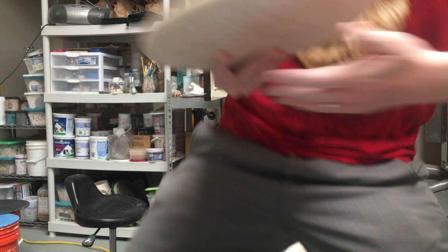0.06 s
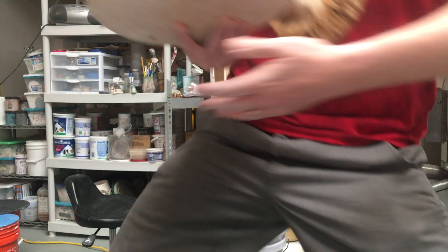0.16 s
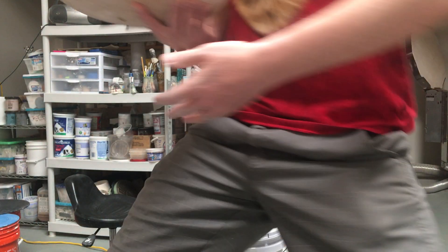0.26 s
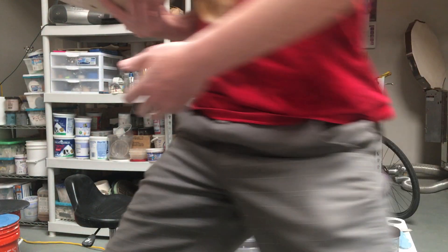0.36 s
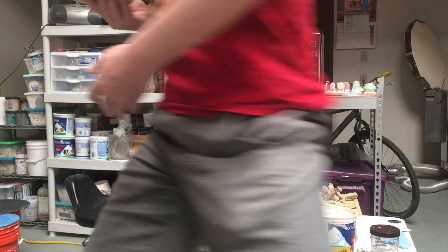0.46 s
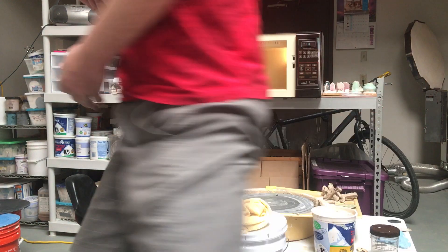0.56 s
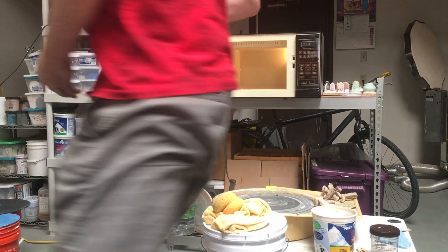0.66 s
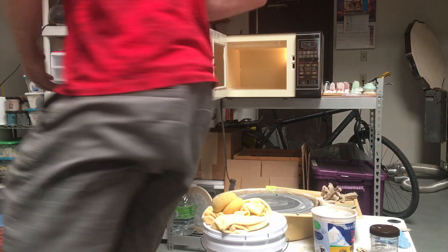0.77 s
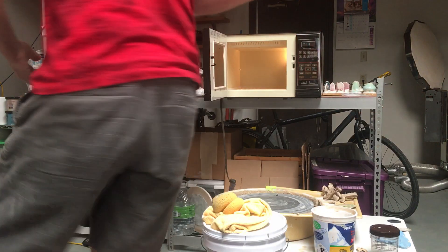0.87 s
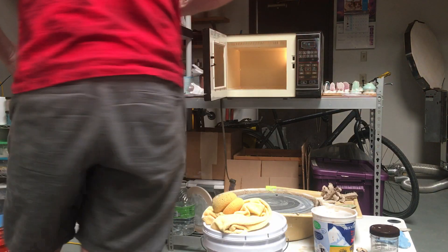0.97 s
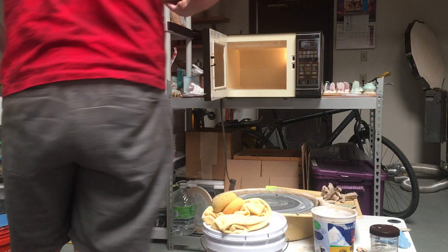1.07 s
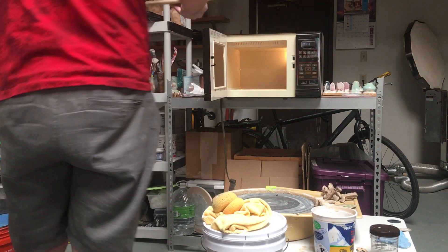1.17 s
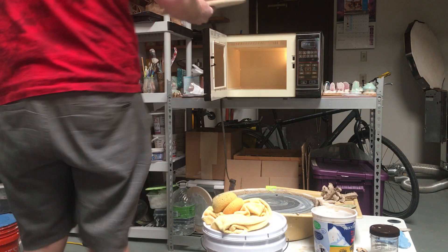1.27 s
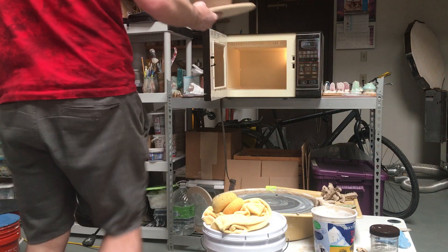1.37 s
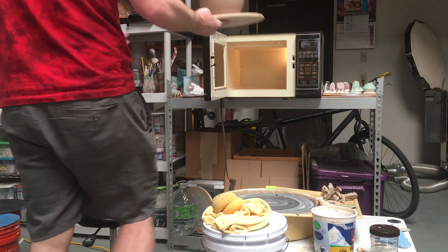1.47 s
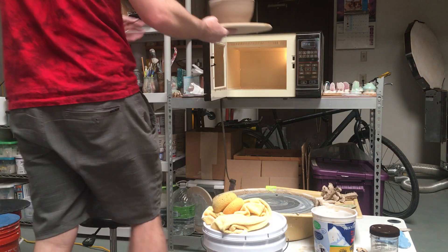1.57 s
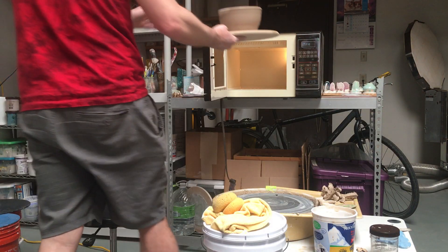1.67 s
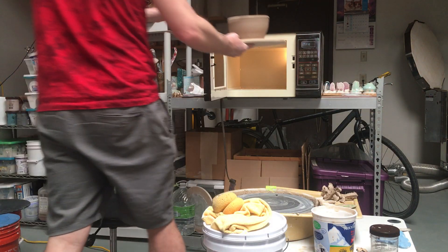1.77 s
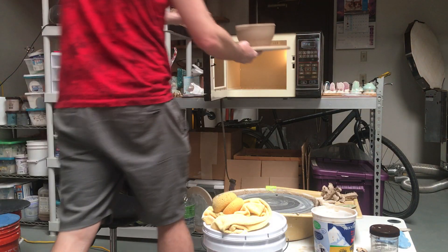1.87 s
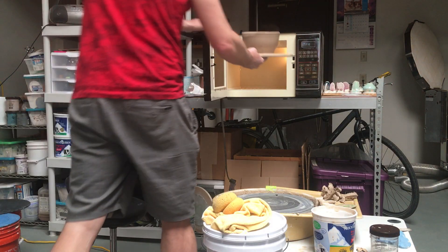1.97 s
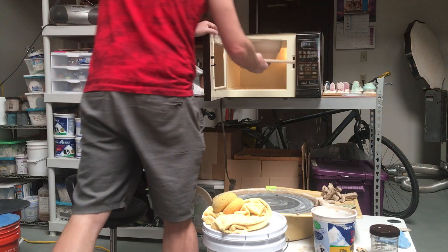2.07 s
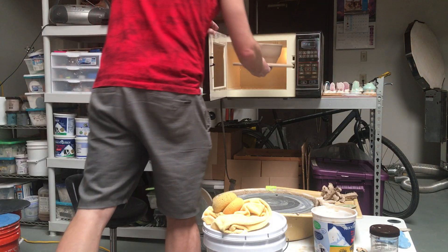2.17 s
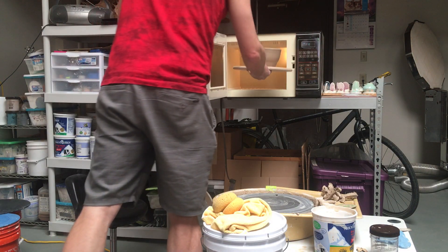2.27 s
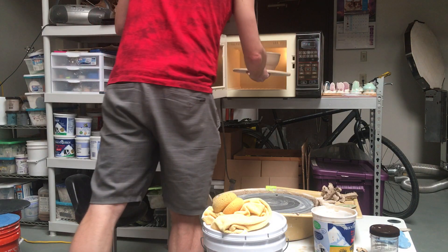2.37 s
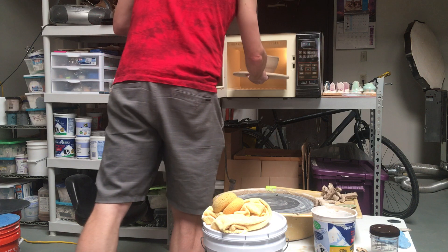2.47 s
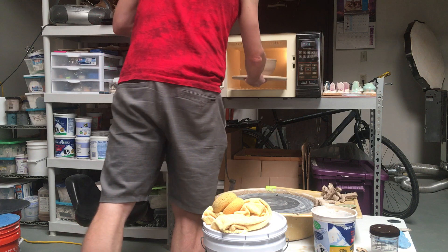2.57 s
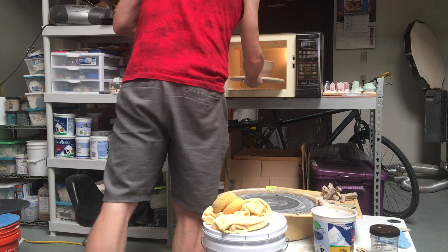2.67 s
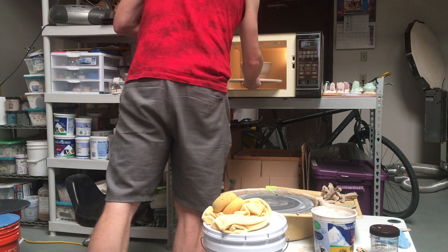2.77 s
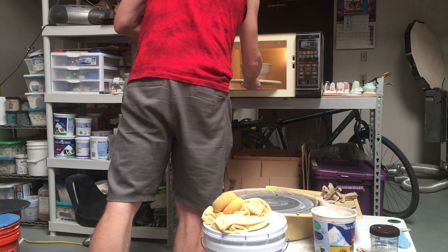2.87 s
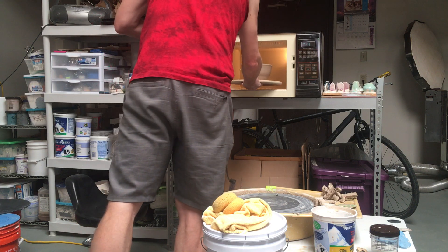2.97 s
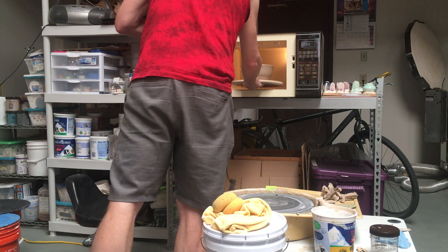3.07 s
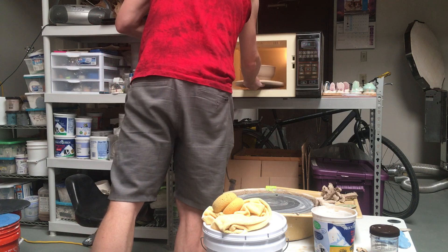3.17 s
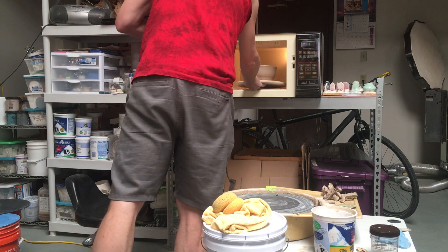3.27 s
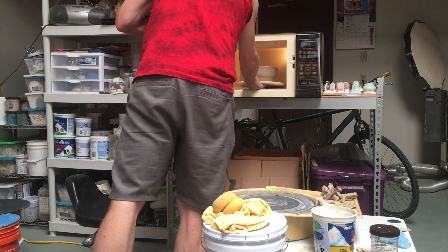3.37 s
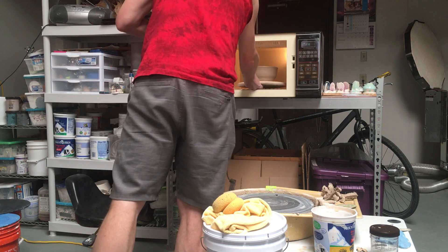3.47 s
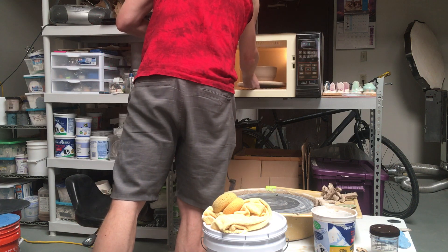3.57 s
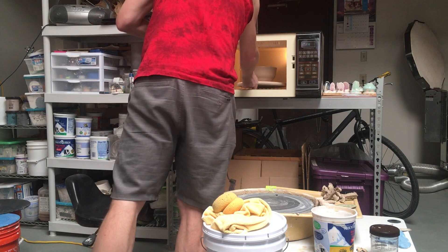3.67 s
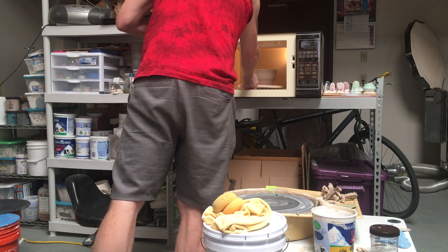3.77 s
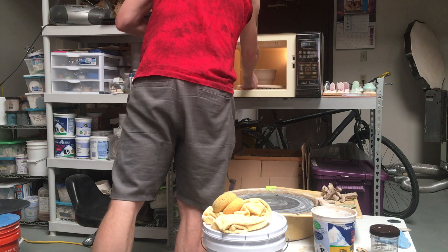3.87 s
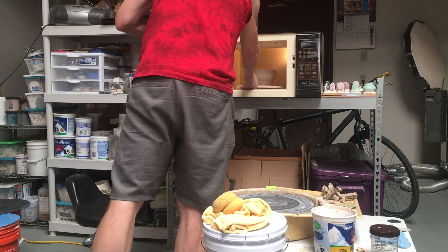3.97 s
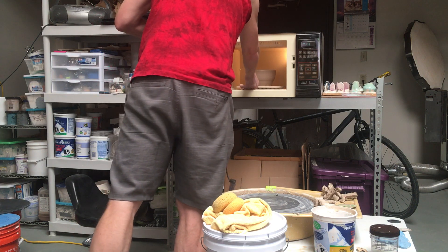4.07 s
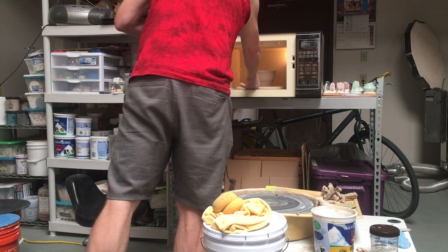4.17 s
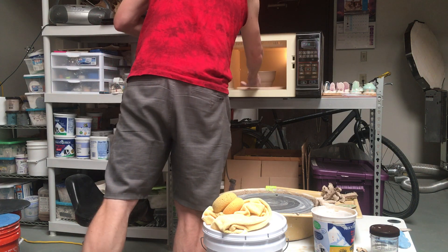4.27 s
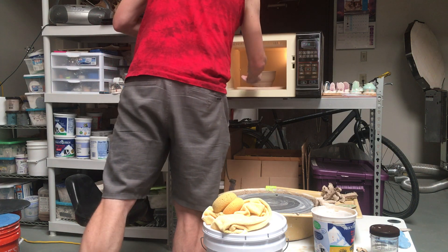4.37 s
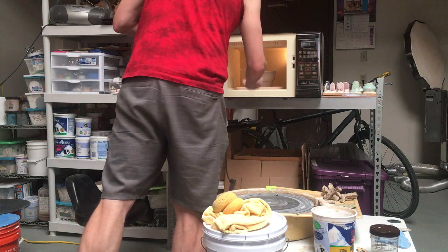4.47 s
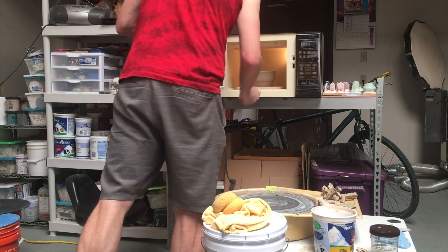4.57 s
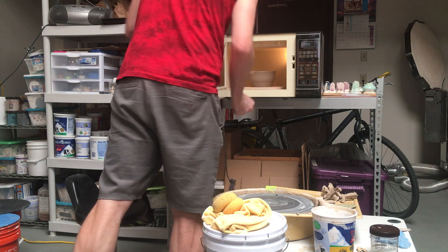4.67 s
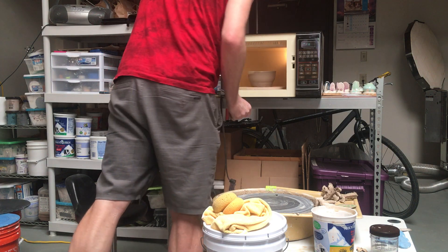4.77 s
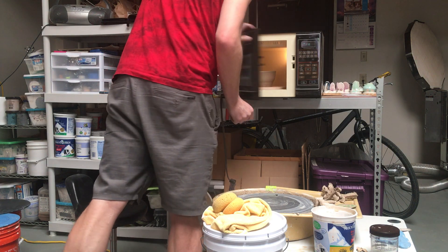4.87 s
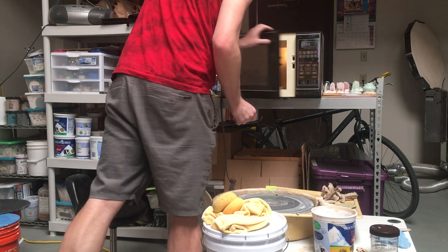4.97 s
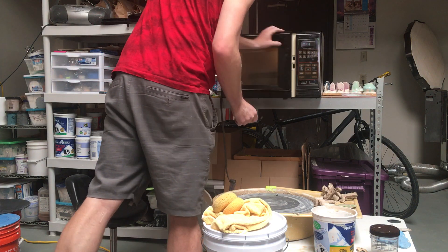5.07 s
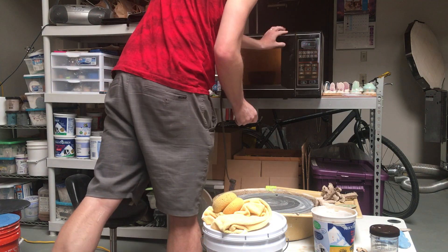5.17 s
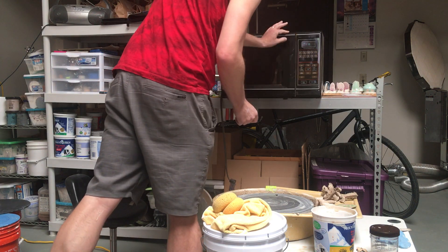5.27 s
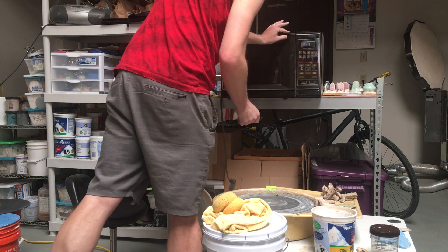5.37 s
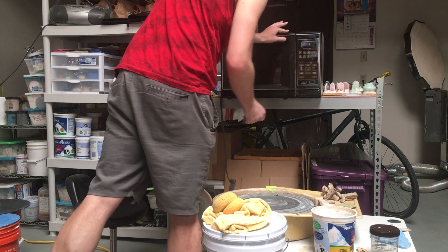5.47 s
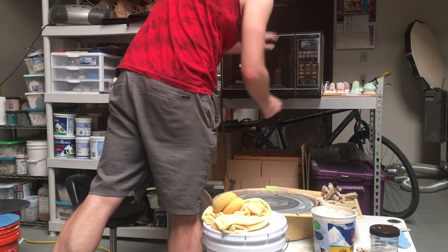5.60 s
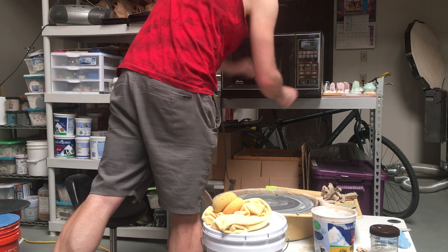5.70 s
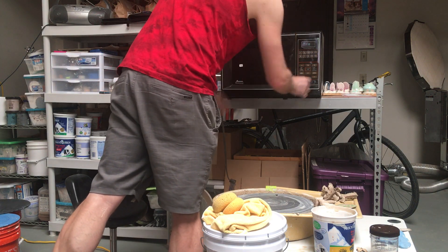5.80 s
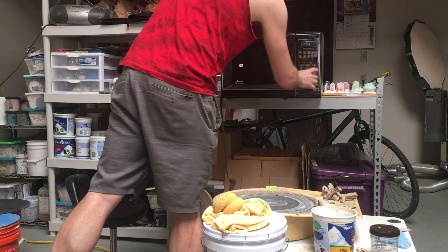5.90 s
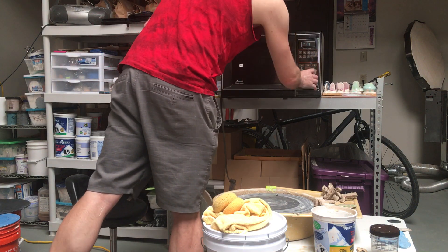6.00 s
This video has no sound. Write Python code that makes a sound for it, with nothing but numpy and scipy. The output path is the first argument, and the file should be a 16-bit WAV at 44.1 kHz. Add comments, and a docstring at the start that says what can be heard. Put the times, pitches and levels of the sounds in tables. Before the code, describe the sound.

Low machine drone, gritty shuffling and small taps, clay bumped and slid inside a microwave oven, then a loud latch clatter with a thump and swelling hum.

```python
"""Clay bowl into the microwave oven

Someone carries a clay bowl on a plate across a garage workshop: filtered noise and ringing specks make
the scuffs, damped resonances the ticks and bumps. The plate knocks on the oven floor and the door latches
and slams: clicks strike clattering noise and ringing modes. The hinge squeaks as noise through resonances.
Steady sines drone over coloured noise throughout, and a lower hum swells once the door is shut."""
import sys
import numpy as np
from scipy import signal
from scipy.fft import rfft, irfft, next_fast_len
from scipy.io import wavfile

SR = 44100
rng = np.random.default_rng(int(sys.argv[2]) if len(sys.argv) > 2 else 0)


def store_pcm(level_fs):
    """Save levels as 16-bit WAV."""
    pcm = np.round(np.clip(level_fs, -1, 1) * 32767).astype(np.int16)
    wavfile.write(sys.argv[1], SR, np.atleast_2d(pcm).T)


N = 266364
T = np.arange(N) / SR  # time in s


def from_db(db):
    """Decibels to amplitude gain."""
    return 10 ** (np.asarray(db) / 20)


def rms_one(x):
    """Scale to unit rms."""
    return x / np.sqrt(np.mean(x ** 2) + 1e-20)


def at_hz(points, hz):
    """Read a (f/Hz, value) table on a log-frequency axis."""
    table_hz, values = np.transpose(points)
    return np.interp(np.log(hz), np.log(table_hz), values)


def low_pass(x, hz):
    """Second-order roll-off of the treble."""
    return signal.sosfilt(signal.butter(2, hz, fs=SR, output="sos"), x + 1e-18)


def clicks(rows):
    """One impulse for each row of (t/s, level/dB)."""
    out = np.zeros(N)
    for s, db in rows:
        out[round(s * SR)] += from_db(db)
    return out


def envelope(start, attack, hold, release_db_per_s):
    """Rise evenly to 1, hold, then die away at a steady rate in dB."""
    age = T - start
    rise = np.clip(age / max(attack, 1 / SR), 0, 1)
    return rise * from_db(-release_db_per_s * np.maximum(age - attack - hold, 0))


def ring(x, hz, t60):
    """A damped resonance: a unit click starts a decaying sine of height 1."""
    radius = from_db(-60 / (t60 * SR))
    angle = 2 * np.pi * hz / SR
    feedback = [1, -2 * radius * np.cos(angle), radius * radius]
    return signal.lfilter([0, np.sin(angle)], feedback, x + 1e-18)


def noise(colour):
    """Steady noise of the given spectrum, rms 1."""
    size = next_fast_len(N)
    hz = np.maximum(np.fft.rfftfreq(size, 1 / SR), 1)
    spectrum = rfft(rng.standard_normal(size)) * from_db(at_hz(colour, hz))
    return rms_one(irfft(spectrum, size)[:N])


def clatter(colour, body_t60, room_db):
    """Response to one blow: short-lived body noise, then the room dying band by band; energy 1."""
    # room decay: f/Hz, t60/s
    room_t60 = [(100, 0.96), (500, 0.62), (1500, 0.52), (3500, 0.54), (6000, 0.43), (10000, 0.27),
                (15000, 0.18)]
    t = T[:SR * 2 // 3]
    edges = np.geomspace(45, 17000, 21)
    white = rng.standard_normal((2, len(t)))
    body = from_db(-60 * t / body_t60)
    out = 0
    for k, (low, high) in enumerate(zip(edges, edges[1:])):
        hz = np.sqrt(low * high)
        room = from_db(room_db - 60 * t / at_hz(room_t60, hz))
        band = signal.butter(2, [low, high], "band", fs=SR, output="sos")
        # neighbouring bands take turns with two independent noises
        burst = signal.sosfilt(band, white[k % 2] * (body + room))
        out = out + from_db(at_hz(colour, hz)) * burst
    return out / np.sqrt(np.sum(out ** 2))


def through(x, response):
    """Pass a signal through an impulse response."""
    return signal.oaconvolve(x, response)[:N]


def struck_modes(modes, blows, spread_db):
    """Every blow wakes each damped mode with a random strength and sign of its own."""
    blows = np.array(blows)
    draws = rng.standard_normal((len(blows), 2, len(modes)))
    weights = np.sign(draws[:, 0]) * from_db(spread_db * draws[:, 1])
    return sum(from_db(db) * ring(w @ blows, hz, t60) for w, (hz, db, t60) in zip(weights.T, modes))


def plate(clatter_db=2, modes_db=-1, boom_hz=170):
    """Clay meets the oven floor; a softer touch is duller, and the cavity booms beneath it."""
    # plate on the oven floor: t/s, level/dB, contact softness as cut-off f/Hz, relative boom level/dB
    contacts = [(3.2177, -10, 1640, 4), (3.365, -33.5, 3030, -10), (3.468, -31.5, 3000, 18),
                (4.2646, -3, 4640, -9.5), (4.277, -8.5, 3160, -10), (4.291, -13.5, 2200, -6)]
    # spectrum of the knocks: f/Hz, level/dB
    knock_colour = [(60, 7.5), (130, 8.5), (300, 4.5), (520, -1.5), (800, -1), (1200, -4), (2300, -3.5),
                    (3300, -9.5), (5000, -15), (8000, -12.5), (15000, -17)]
    # plate and oven cavity resonances: f/Hz, relative level/dB, t60/s
    oven_modes = [(190.1, -31.5, 0.44), (255.8, -36.5, 0.24), (363, -56, 0.38), (459, -44, 0.54),
                  (606, -48, 0.44), (746, -43, 0.38), (890, -46, 0.34), (1027, -47, 0.54),
                  (1316, -39, 0.24), (1762, -33, 0.086), (1856, -44, 0.15), (2036, -38.5, 0.18),
                  (2300, -32, 0.061), (2770, -65, 0.43)]
    blows = []
    for s, db, soft_hz, boom_db in contacts:
        blow = clicks([(s, db)])
        boom = from_db(boom_db) * low_pass(blow, boom_hz)
        blows.append(low_pass(blow, soft_hz) + boom)
    knocks = sum(through(blow, clatter(knock_colour, body_t60=0.072, room_db=-5.5)) for blow in blows)
    ringing = struck_modes(oven_modes, blows, spread_db=2.5)
    return from_db(modes_db) * ringing + from_db(clatter_db) * knocks


def door(clatter_db=-1, panel_db=-4):
    """The latch clacks in quick steps, each striking its own clatter and mix of panel modes."""
    # hooks ride over the catch, the door lands and rattles: t/s, relative level/dB
    hits = [(5.2502, -9), (5.262, -6.5), (5.2693, -4.5), (5.28, -14.5), (5.2919, -1.5), (5.296, 0),
            (5.301, -3.5), (5.322, -13.5)]
    # spectrum of the clack: f/Hz, level/dB
    door_colour = [(60, -13), (170, 10.5), (300, 4), (520, -5.5), (1000, 2.5), (1500, 1.5), (2200, 3),
                   (3200, 0.5), (4900, -7.5), (6500, -3), (10000, -9), (15000, -9)]
    # latch and door panel resonances: f/Hz, relative level/dB, t60/s
    door_modes = [(890, -35.5, 0.1), (1074, -57, 1), (1166, -37, 0.23), (2070, -35, 0.13),
                  (2307, -38.5, 0.25), (2724, -39.5, 0.29), (2955, -44, 0.24), (3260, -44, 0.26),
                  (3340, -52, 0.45), (4050, -45, 0.23), (6500, -54, 0.2)]
    blows = [clicks([hit]) for hit in hits]
    clack = sum(through(blow, clatter(door_colour, body_t60=0.049, room_db=-7.5)) for blow in blows)
    panel = struck_modes(door_modes, blows, spread_db=2)
    return from_db(clatter_db) * clack + from_db(panel_db) * panel


def thump(push_hz=240):
    """The door's weight rocks the cabinet on its shelf: softened pushes ring low modes."""
    # pushes of the door's weight: t/s, relative level/dB
    pushes = [(5.268, -2.5), (5.299, 0.5), (5.358, -6)]
    # cabinet and shelf resonances: f/Hz, relative level/dB, t60/s
    thump_modes = [(59.3, -29, 0.64), (76.6, -48, .4), (92.8, -34, 0.83), (103.9, -22.5, 0.31),
                   (172.7, -31.5, 0.35), (290, -36, 0.17)]
    push = low_pass(clicks(pushes), push_hz)
    return sum(from_db(db) * ring(push, hz, t60) for hz, db, t60 in thump_modes)


def hinge():
    """Faint rasping squeaks: fine slips in a few broad resonances, each catch dying away."""
    # the hinge catches as the door swings: t/s, level/dB, pitch as a ratio
    squeaks = [(5.129, -62, 1.044), (5.181, -68.5, 0.92)]
    # hinge resonances before the pitch ratio: f/Hz, relative level/dB, t60/s
    hinge_modes = [(1440, 1, 0.013), (2300, 2.5, .005), (5730, 5, 0.0034), (8500, 8.5, 0.0013)]
    slips = rng.standard_normal(N)
    out = 0
    for s, db, ratio in squeaks:
        squeak = sum(from_db(mode_db) * ring(slips, ratio * hz, t60) for hz, mode_db, t60 in hinge_modes)
        swing = envelope(s, attack=0.0035, hold=0.01, release_db_per_s=150)
        out = out + from_db(db) * swing * rms_one(squeak)
    return out


def ticks(cycles=5.8, grit_t60=0.023, grit_db=-14, room_db=-8):
    """Small sharp contacts: a few cycles of one damped resonance with a gritty crack, then the room."""
    # ticks and taps of hands, plate, shoes and latch: t/s, level/dB, pitch f/Hz, relative crack level/dB
    taps = [(.042, -40, 3130, -9), (.329, -35.5, 3430, -8.5), (.359, -40, 3300, -4),
            (0.3782, -19.5, 3250, -2.5), (0.3793, -33, 1920, -24), (.604, -40.5, 610, -20),
            (.909, -41, 1480, -2.5), (.966, -42.5, 590, 0.5), (.982, -38.5, 780, -13),
            (1.233, -35.5, 640, 2.5), (1.258, -31, 2300, -1), (1.292, -31, 2640, -12),
            (1.348, -39, 1060, 2), (1.379, -37, 576, 1.5), (1.879, -36.5, 400, -2),
            (3.219, -50.5, 5050, 9.5), (3.299, -47.5, 7040, 1), (4.569, -47, 640, -18),
            (5.2973, -15, 3020, -0.5)]
    # spectrum of the room's answer: f/Hz, level/dB
    room_colour = [(100, 0), (15000, -4)]
    out = np.zeros(N)
    t = T[:SR // 8]
    touch = (t == 0) * 1.0
    for s, db, hz, crack_db in taps:
        grain = from_db(grit_db - 60 * t / grit_t60) * rng.standard_normal(len(t))
        band = signal.butter(2, [hz / 2, min(12 * hz, 11000)], "band", fs=SR, output="sos")
        crack = signal.sosfilt(band, touch + 2 * grain)
        tick = ring(touch, hz, cycles / hz) + from_db(crack_db) * crack
        at = round(s * SR)
        out[at:at + len(t)] += from_db(db) * tick
    room = through(out, clatter(room_colour, body_t60=0.12, room_db=-8.5))
    return out + from_db(room_db) * room


def friction_levels():
    """Strength of rasp and hiss: brief rubs share one shape, scuff and slide follow their effort."""
    # brief rubs of soles, cloth and plate: t/s, attack/s, hold/s, relative rasp level/dB, hiss level/dB
    rubs = [(0.89, 0.1, 0.071, -58, -64.5), (1.238, 0.014, .11, -56.5, -64.5),
            (1.788, 0.0037, 0.0084, -73.5, -61), (2.582, 0.0057, 0.024, -67, -63.5),
            (4.202, 0.08, .005, -58.5, -62.5), (4.62, .45, .04, -86, -71.5)]
    # long scuff during the turn toward the oven: t/s, relative rasp level/dB, hiss level/dB
    scuff = [(0.39, -62, -55), (0.428, -54.5, -49.5), (0.492, -56.5, -56), (0.592, -66.5, -57.5),
             (0.598, -68, -61), (0.64, -70, -67)]
    # the plate slides into the oven: t/s, relative rasp level/dB, hiss level/dB
    slide = [(3.365, -68.5, -67.5), (3.439, -70, -68.5), (3.465, -64, -65.5), (3.553, -70.5, -69),
             (3.635, -72, -64), (3.763, -65.5, -65.5), (3.801, -59.5, -61), (3.9, -73.5, -75.5)]
    release_db_per_s = 188
    levels = np.zeros((2, N))
    for start, attack, hold, rasp_db, hiss_db in rubs:
        levels += from_db([[rasp_db], [hiss_db]]) * envelope(start, attack, hold, release_db_per_s)
    for stroke in (scuff, slide):
        s, *columns = np.transpose(stroke)
        effort = from_db([np.interp(T, s, db) for db in columns])
        levels += effort * envelope(s[0], 0, s[-1] - s[0], release_db_per_s)
    return levels


def grit(per_s=420, cycles=11):
    """Specks catch at random and each rings briefly at one of a few pitches; rms 1."""
    sizes = from_db(3 * np.minimum(rng.exponential(1, N), 3))
    specks = (rng.random(N) < per_s / SR) * rng.choice([-1, 1], N) * sizes
    pitches = np.geomspace(1000, 3400, 14)  # Hz
    dealt = rng.integers(0, len(pitches), N)
    return rms_one(sum(ring(specks * (dealt == k), hz, cycles / hz) for k, hz in enumerate(pitches)))


def rubbing(grain_db=0.7, grain_hz=160, rasp_db=-2, grit_db=-3, sizzle_db=2):
    """Friction noise and grit, the noise roughened by surfaces catching and letting go."""
    # coarse part of the friction noise: f/Hz, level/dB
    rasp_colour = [(200, 4.5), (600, -1), (1150, -0.5), (2600, -0.5), (4500, -7), (8000, -53), (15000, -41)]
    # fine part of the friction noise: f/Hz, level/dB
    hiss_colour = [(1000, -28), (3500, 0), (6000, 7.5), (9000, 6.5), (12000, 3), (15000, -2)]
    # top end of a firm stroke: f/Hz, level/dB
    sizzle_colour = [(6000, -28), (11000, -3), (14000, -2.5)]
    rasp, hiss = friction_levels()
    wander = rms_one(low_pass(rng.standard_normal(N), grain_hz))
    catch = rms_one(from_db(grain_db * wander))
    friction = from_db(rasp_db) * rasp * noise(rasp_colour) + hiss * noise(hiss_colour)
    # a firmer stroke is also a brighter one
    firmness = np.sqrt(hiss / hiss.max())
    sizzle = from_db(sizzle_db) * hiss * firmness * noise(sizzle_colour)
    return catch * (friction + sizzle) + from_db(grit_db) * rasp * grit()


def nearby_surfaces(x):
    """Hard surfaces close by return early copies that ripple the spectrum."""
    # early echoes from the table and shelves: delay/s, level/dB
    echoes = [(.0017, -29), (.0043, -27), (.0071, -17.5)]
    return x + sum(from_db(db) * np.interp(T - delay, T, x, left=0) for delay, db in echoes)


def bumps(soft_hz=200):
    """Soft weight shifts wake one low resonance each."""
    # heavy footfalls and bumps: t/s, relative level/dB, pitch f/Hz
    footfalls = [(0.421, -51, 200), (1.238, -45.5, 171), (2.613, -46.5, 174), (2.655, -34, 102.1),
                 (3.479, -36.5, 192.4)]
    return sum(ring(low_pass(clicks([(s, db)]), soft_hz), hz, t60=.35) for s, db, hz in footfalls)


def workshop(rumble_db=-55, air_db=-70.5, hum_db=-40, hum_hz=74.6):
    """Steady machine tones throb together over rumble and air; the low hum swells late, then sags."""
    # machine tones: f/Hz, rms level/dB
    machine_tones = [(57.4, -61), (74.5, -57), (85.7, -53.5), (102.9, -53.5), (120, -49), (608, -90),
                     (824, -88)]
    # the room's steady rumble: f/Hz, level/dB
    rumble_colour = [(25, -19), (38, 3), (55, 0), (76, 0.5), (100, -2), (160, -5.5), (220, -10.5),
                     (400, -27.5)]
    # the room's faint air: f/Hz, level/dB
    air_colour = [(150, -5), (250, -7.5), (420, 7), (560, -8.5), (820, -1.5), (1500, -4), (2400, -2.5),
                  (3500, -6), (4900, -11), (6100, -5.5), (7600, -12.5), (9400, -7.5), (10600, -11),
                  (13000, -6), (16000, -12.5)]
    drone = sum(from_db(db) * np.sin(2 * np.pi * hz * T) for hz, db in machine_tones)
    swell = envelope(start=5.43, attack=0.28, hold=0.1, release_db_per_s=21)
    hum = from_db(hum_db) * swell * np.sin(2 * np.pi * hum_hz * T)
    rumble = from_db(rumble_db) * low_pass(noise(rumble_colour), 493)
    air = from_db(air_db) * noise(air_colour)
    # root two turns rms levels into sine heights
    return np.sqrt(2) * (drone + hum) + rumble + air


def scene():
    """All sources at one microphone; the handling also reflects off nearby surfaces."""
    handling = plate() + door() + hinge() + ticks() + rubbing()
    return (nearby_surfaces(handling) + thump() + bumps() + workshop())[None]


def record(dry, bass_cut_hz=46, cutoff_hz=15900):
    """The small microphone loses the deep bass; the top is cut steeply."""
    bass_cut = signal.butter(6, bass_cut_hz, "high", fs=SR, output="sos")
    thin = signal.sosfilt(bass_cut, dry)
    # 0.2 dB passband ripple, 70 dB down above the cut-off
    top_cut = signal.ellip(10, .2, 70, cutoff_hz, fs=SR, output="sos")
    return signal.sosfilt(top_cut, thin)


dry = scene()
out = record(dry)
store_pcm(out)
```